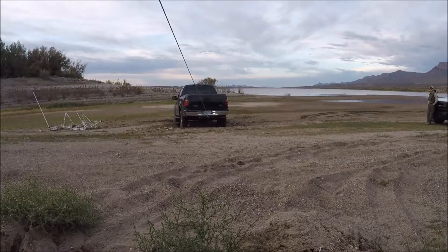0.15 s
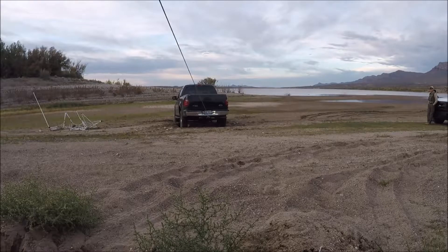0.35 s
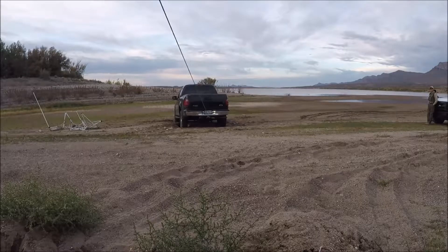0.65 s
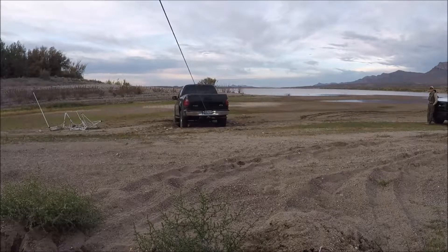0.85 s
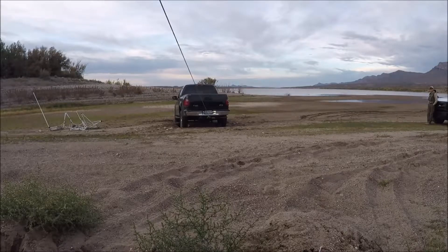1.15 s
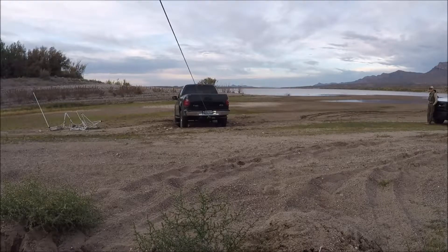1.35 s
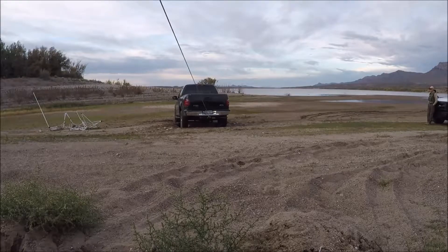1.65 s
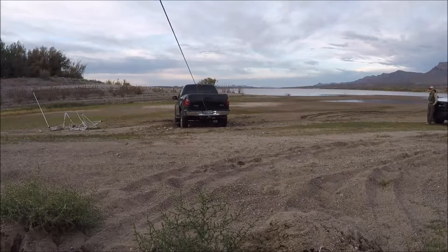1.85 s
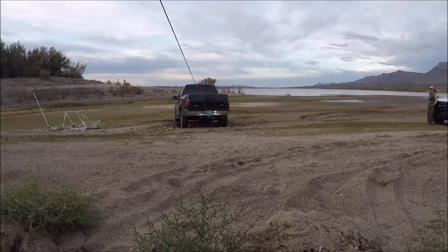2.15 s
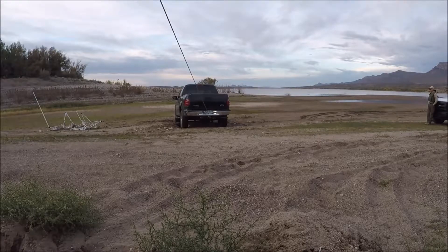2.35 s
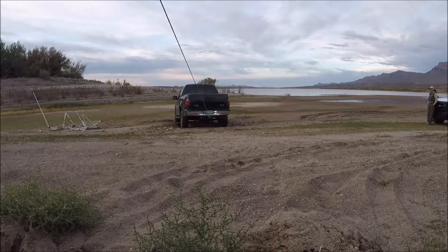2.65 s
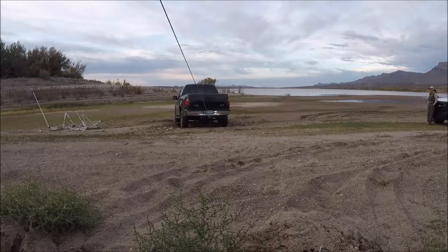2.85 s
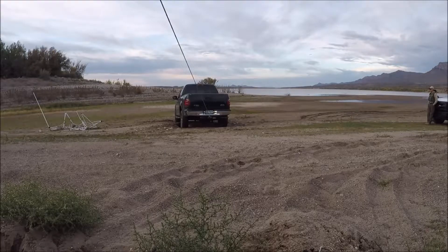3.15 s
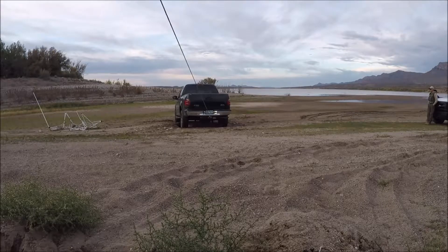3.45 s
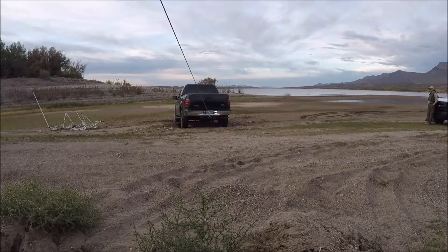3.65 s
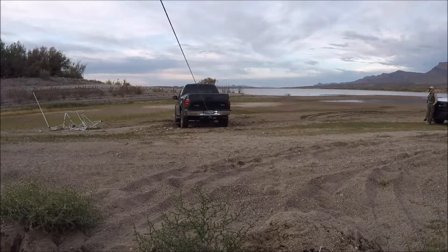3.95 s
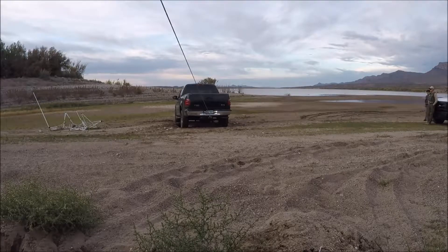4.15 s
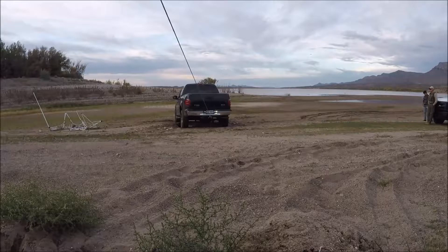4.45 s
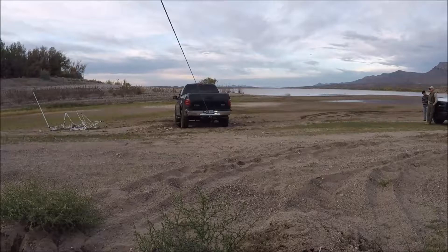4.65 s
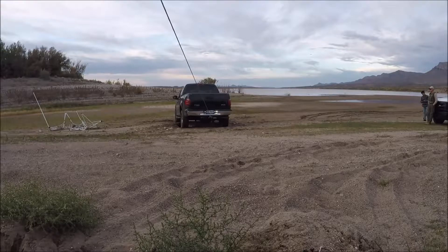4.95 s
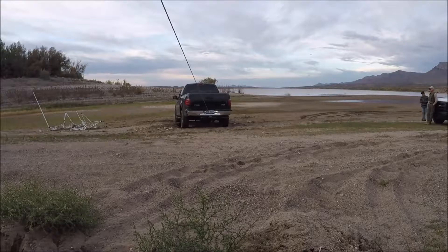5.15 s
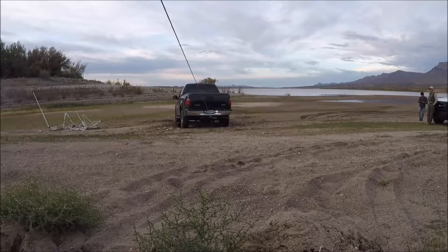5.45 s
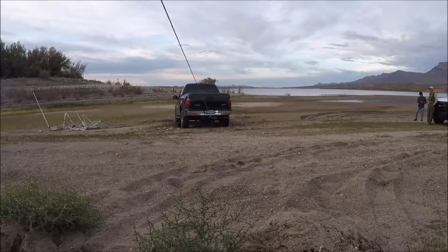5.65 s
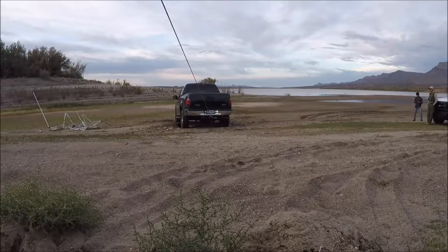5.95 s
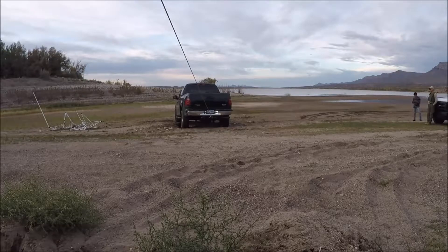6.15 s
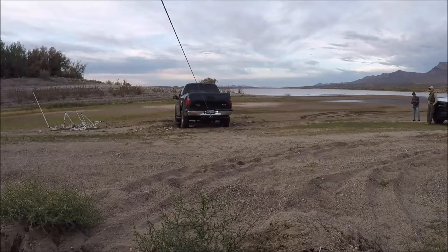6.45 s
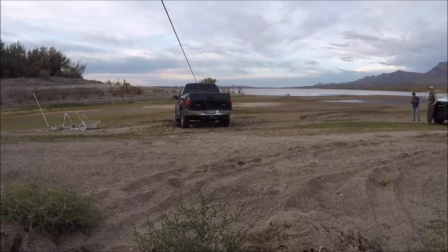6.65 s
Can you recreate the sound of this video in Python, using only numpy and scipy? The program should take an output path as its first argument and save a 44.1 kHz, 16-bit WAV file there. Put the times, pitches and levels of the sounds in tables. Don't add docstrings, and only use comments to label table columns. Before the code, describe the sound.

A truck's diesel engine runs at steady fast idle with a clear winch pump whine, deep throbbing, mechanical clatter, light wind and small cable ticks outdoors.

```python
import sys
import numpy as np
from scipy import signal
from scipy.fft import rfft, irfft, next_fast_len
from scipy.io import wavfile
from scipy.ndimage import uniform_filter1d, map_coordinates

SR = 44100
rng = np.random.default_rng(int(sys.argv[2]) if len(sys.argv) > 2 else 0)


def wav_record(signal):
    frames = np.transpose(np.atleast_2d(signal))
    bounded = np.clip(frames, -1, 1)
    quanta = np.round(bounded * 32767).astype(np.int16)
    wavfile.write(sys.argv[1], SR, quanta)


def ratio_of_db(decibels):
    return 10 ** (np.asarray(decibels, float) / 20)


N = 300753


def unit(x):
    return x / np.sqrt(np.mean(x ** 2) + 1e-20)


def curves(rows):
    times, *columns = np.transpose(rows)
    return [np.interp(np.arange(N) / SR, times, column) for column in columns]


def wobble(rate):
    where = np.arange(N) * min(rate, 25) / SR
    return map_coordinates(rng.standard_normal(200), [where])


def filtered(x, response):
    size = next_fast_len(N + SR // 2)
    spectrum = rfft(x, size) * response(np.fft.rfftfreq(size, 1 / SR))
    return irfft(spectrum, size)[:N]


def colour(points):
    hz, db = np.transpose(points)
    return lambda f: ratio_of_db(np.interp(np.log(f + 1), np.log(hz), db, left=-120, right=-120))


def band(hz, width):
    return lambda f: 1j * f * width / (hz * hz - f * f + 1j * f * width)


def tone(turns, db, unsteady_db):
    level = np.sqrt(2) * ratio_of_db(db + unsteady_db * wobble(4))
    return level * np.cos(2 * np.pi * turns)


# (time [s], whine [Hz])
SPEED = [(0, 719.5), (.76, 721.2), (1.35, 724.3), (1.92, 725.2), (2.4, 724.2), (2.85, 719.3), (3.55, 725),
         (4.29, 725), (4.82, 722.6), (5.9, 721.6), (6.82, 722.4)]


def engine_speed():
    return uniform_filter1d(curves(SPEED)[0], size=9000)


# (cycles per crank turn [orders], level [dB])
TEETH = [(15, -44), (18, -33), (20, -45), (21, -27), (24, -43), (38, -47), (39, -31), (40, -44), (41, -37),
         (42, -20), (43, -44), (45, -37), (46, -45), (51, -45), (54, -44), (57, -45), (58, -49), (63, -36),
         (64, -44), (66, -40), (67, -49), (69, -48), (81, -46), (84, -44), (102, -44), (103, -49),
         (105, -45), (106, -50), (109, -52)]
# (crank order [orders], level [dB])
HALVES = [(39.5, -50), (40.5, -44), (41.5, -43), (45.5, -50), (50, -50), (56, -49), (56.5, -48),
          (57.5, -52), (59.5, -53), (60, -52), (82.5, -49), (83, -52), (87, -52), (103.5, -52),
          (104.5, -51), (105.5, -45), (108, -53), (111.5, -53)]


def pump(crank, whine_hz):
    fast_hz = whine_hz - 722
    t = np.arange(N) / SR
    whine_db = -19 - 0.58 * fast_hz - 0.18 * t
    tooth_db = -27 + 0.42 * fast_hz
    level = {21: tooth_db, 42: whine_db}
    lag = -.0123
    total = 0
    for k, db in TEETH + HALVES:
        unsteady_db = .4 if k in level else 1.1
        total = total + tone(k * crank - lag * k * k, level.get(k, db), unsteady_db)
    return total


# (time [s], 6th-order throb level [dB])
THROB = [(0, -17), (.6, -15), (1.7, -15.5), (2.1, -14.5), (3.1, -15.5), (3.7, -15.5), (4.1, -13),
         (4.6, -16.5), (5.2, -15.5), (5.7, -14), (6.3, -16.5), (6.82, -15)]
# (cycles per shaft turn [orders], level [dB])
SHAFT = [(2, -38), (3, -39), (4, -29), (5, -26), (6, -15), (7, -36), (8, -18), (9, -40), (10, -32),
         (11, -32), (12, -32), (13, -37), (14, -32), (15, -40), (16, -37), (17, -36), (18, -38), (19, -46),
         (20, -43), (21, -42), (22, -39), (23, -45), (25, -45), (26, -37), (30, -50), (31, -49)]
# (crank order [orders], level [dB], unsteadiness [dB])
PULLEYS = [(3.5, -39, 5), (9.89, -34.5, 2), (38.6, -41.5, 4.5)]
SHAFT_RATIO, FOURTH_DB = .748, -37


def accessories(crank):
    sixth_db = curves(THROB)[0]
    level = {4: FOURTH_DB, 6: sixth_db, 8: sixth_db - 3}
    start = {4: .5, 6: 0, 8: 0}
    total = tone(19.32 * crank, -27.5 - .45 * np.arange(N) / SR, 0.69)
    for k, db in SHAFT:
        turns = k * SHAFT_RATIO * crank + start.get(k, rng.random())
        total = total + tone(turns, level.get(k, db), .4 if k in level else 1.5)
    for k, db, shake_db in PULLEYS:
        total = total + tone(k * crank, db, shake_db)
    return total


def firing(crank):
    in_step_s = 1.2
    lag = (3 - 4 * SHAFT_RATIO) * crank[round(in_step_s * SR)] - .5
    return tone(3 * crank - lag, -28, 1.2)


# (width [Hz], level [dB])
BLOCK = [(68, -2), (120, -11.5), (52, 0), (20, 1), (53, 1.5), (102, 0), (29.8, -5.5), (45, -13), (142, -2),
         (35, -3.5), (40, -3.5), (70.4, -3), (27.2, -4), (39, -7.5), (100, -7.5), (70, -6), (82, -14.5),
         (46.3, -10), (110, -15.5), (230, -22.5), (170, -19), (29, -25), (60, -22), (60, -31.5),
         (120, -14.5)]
BLOCK_HZ = [700, 880, 980, 1110, 1420, 1790, 1920, 2070, 2160, 2330, 2420, 2540, 2890, 3120, 3260, 3600,
            3900, 4360, 4760, 5420, 6320, 6510, 6860, 7610, 8550]
# (frequency [Hz], level per Hz [dB])
CASING = [(400, -9), (520, -4.5), (1000, -11), (1600, -19), (2700, -22.5), (4000, -23.5), (5200, -28),
          (6600, -28.5), (7000, -38.5), (8600, -38), (10700, -43.5), (11200, -47.5), (13400, -49),
          (15200, -67.5)]


def clatter(crank, level_db):
    size = 2600
    lumps = ratio_of_db(1.2 * unit(uniform_filter1d(rng.standard_normal(2 * size), size=60, mode="wrap")))
    per_turn = np.tile(rng.standard_normal(size), 2)
    per_cycle = 0.85 * rng.standard_normal(2 * size)
    orders = rfft(unit(lumps * (per_turn + per_cycle)))
    orders /= (np.abs(orders) / np.abs(orders).mean()) ** .3
    orders[:140] *= .75
    orders[:44] *= .3
    orders[[int(2 * k) for k, _ in TEETH + HALVES]] = 0
    play = .0003 * wobble(22)
    where = [(crank + play) % 2 * size]
    strikes = map_coordinates(irfft(orders), where, order=3, mode="grid-wrap")
    source = strikes * ratio_of_db(0.53 * wobble(18)) + 0.61 * rng.standard_normal(N)

    def block(f):
        power = sum(np.abs(ratio_of_db(db) * band(hz, width)(f)) ** 3 for hz, (width, db) in zip(BLOCK_HZ, BLOCK))
        return np.sqrt(power) / (1 + (600 / (f + 1)) ** 4) / (1 + (f / 6800) ** 8)

    ringing = ratio_of_db(-4.5) * unit(filtered(source, block))
    broad = ratio_of_db(-5.5) * unit(filtered(source, colour(CASING)))
    return ratio_of_db(level_db) * (ringing + broad)


# (time [s], strength [dB])
WIND = [(0.0, -22), (0.04, -20.5), (0.23, -23.5), (1.54, -23), (1.63, -18), (2.47, -24), (2.51, -22),
        (3.06, -26), (3.17, -21), (4.2, -24.5), (4.23, -25.5), (4.94, -29.5), (5.24, -22.5), (5.87, -28),
        (6.78, -22), (6.82, -20.5)]


def wind_swing():
    strength_db = curves(WIND)[0]
    return strength_db - strength_db.mean()


# (frequency [Hz], level per Hz [dB])
RUMBLE = [(12, -31.5), (25, -13), (45, -5.5), (65, 2), (90, 1), (115, -4), (165, -5.5), (200, -15),
          (260, -11), (340, -11.5), (400, -14.5), (650, -17), (900, -18.5)]


def wind(swing_db):
    gust_db = -24 + 1.83 * swing_db
    rumble_db = -28.5 + 0.63 * swing_db
    puffs = rng.standard_normal(N) * ratio_of_db(gust_db + .6 * wobble(9))
    gusts = ratio_of_db(22) * filtered(puffs, lambda f: band(168, 70)(f) ** 3)
    roll = rng.standard_normal(N) * ratio_of_db(1.2 * wobble(2.98))
    return gusts + ratio_of_db(rumble_db + 3.5) * unit(filtered(roll, colour(RUMBLE)))


# (time [s], bright edge level [dB], body level [dB], ring level [dB])
TICKS = [(0.0125, -48, -33.5, -55), (0.0823, -47.5, -34.5, -40), (0.155, -48, -52, -54),
         (0.1734, -56, -34, -43), (0.197, -45.5, -29.5, -50), (0.249, -49, -32.5, -52),
         (0.331, -48, -39, -44.5), (0.337, -44.5, -32.5, -40), (0.378, -56, -48, -56),
         (0.4299, -59, -44, -36.5), (0.5336, -49, -34.5, -46), (0.6759, -47.5, -37.5, -58),
         (0.752, -53.5, -32.5, -51), (0.8439, -51, -36.5, -55), (1.1158, -53, -41, -59),
         (1.204, -43.5, -34.5, -42), (2.152, -59, -36.5, -52), (2.4692, -44, -45, -55),
         (2.813, -56.5, -37, -55.5), (3.1153, -53.5, -42, -55), (3.4084, -54, -33.5, -51),
         (3.451, -58, -36.5, -48.5), (3.535, -55, -29, -47), (3.876, -52.5, -32, -48),
         (4.678, -52.5, -32, -48), (6.6711, -54.5, -37, -54.5)]
# (time [s], peak level [dB], frequency [Hz])
KNOCKS = [
    (.34, -21, 1300),
    (.69, -17.5, 494),
    (3.537, -14, 532),
    (3.54, -18, 640),
    (3.529, -36, 413),
    (4.685, -18.5, 556),
]


def cable():
    t = np.arange(SR // 8) / SR
    edge, body, ring, knocks = parts = np.zeros((4, N + len(t)))
    rise = 1 - np.exp(-t / 0.0004)
    decay_db = -60 * t / [[.035], [.06], [.03]]
    for s, *levels_db in TICKS:
        rattle = ratio_of_db(np.c_[levels_db] + decay_db) * rise * rng.standard_normal((3, len(t)))
        parts[:3, round(s * SR):][:, :len(t)] += rattle
    grit = rng.random(N) < 30 / SR
    edge[:N] += grit * ratio_of_db(-62 + 5.5 * rng.standard_normal(N))
    for s, db, hz in KNOCKS:
        swell = ratio_of_db(db - 60 * t / 0.094) * (1 - np.exp(-t / 0.0052))
        knocks[round(s * SR):][:len(t)] += swell * np.sin(2 * np.pi * hz * t)
    bright = ratio_of_db(1.5) * filtered(edge[:N], lambda f: band(12800, 5000)(f) ** 3)
    middle = ratio_of_db(9) * filtered(body[:N], lambda f: band(4400, 4400)(f) ** 3)
    between = ratio_of_db(8) * filtered(ring[:N], lambda f: band(8600, 2600)(f) ** 3)
    return bright + middle + between + knocks[:N]


def scene():
    whine_hz = engine_speed()
    hunting = .0008 * wobble(7)
    crank = np.cumsum(whine_hz) / 42 / SR + hunting
    swing_db = wind_swing()
    engine = pump(crank, whine_hz) + accessories(crank) + firing(crank)
    rattle = clatter(crank, -30 + 0.26 * swing_db)
    mix = engine + rattle + wind(swing_db) + cable()
    return mix[None]


def band_limit(x):
    return signal.sosfilt(signal.butter(12, 14980, fs=SR, output="sos"), x)


def record(dry):
    soft = dry / (1 + np.abs(dry / 1.1) ** 6) ** (1 / 6)
    to_edge = np.minimum(N - np.arange(N), np.arange(N))
    fade = np.sin(np.pi / 2 * np.clip(to_edge / 40, 0, 1))
    return band_limit(soft * fade)


dry = scene()
out = record(dry)
wav_record(out)
```